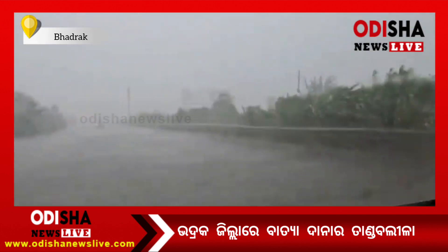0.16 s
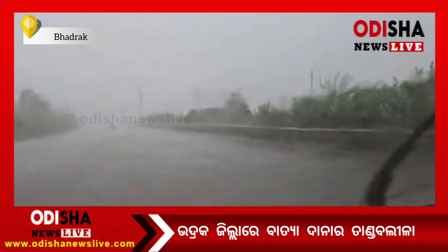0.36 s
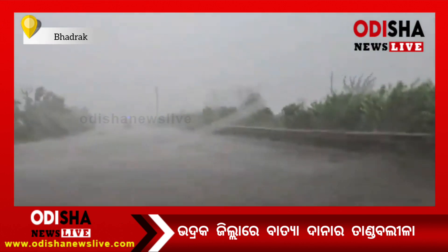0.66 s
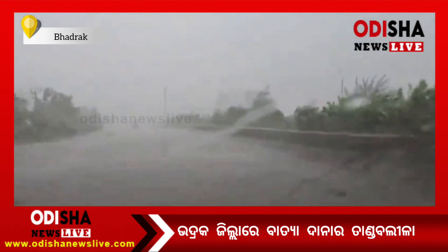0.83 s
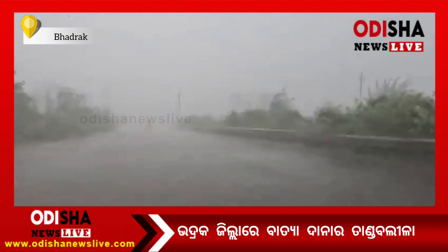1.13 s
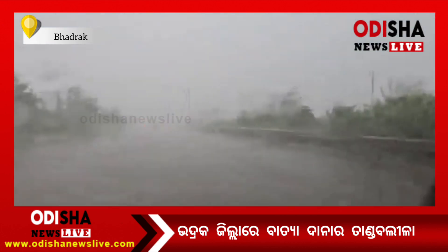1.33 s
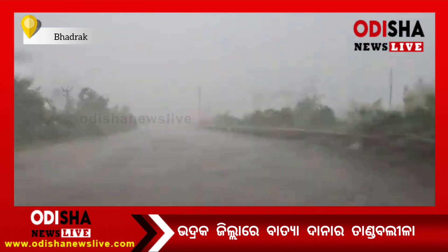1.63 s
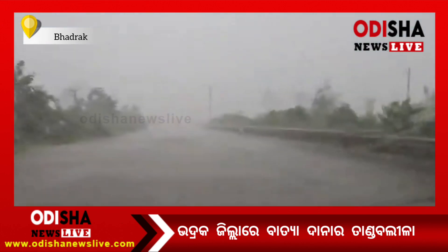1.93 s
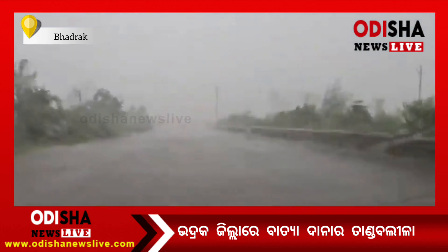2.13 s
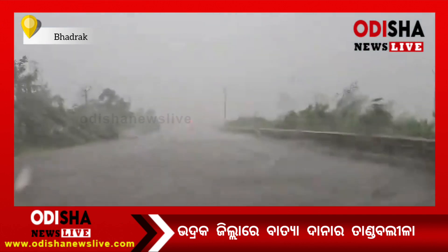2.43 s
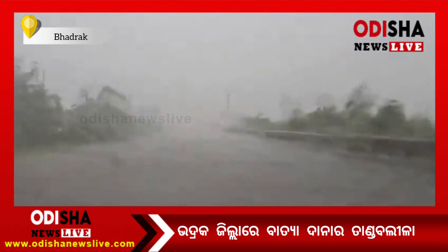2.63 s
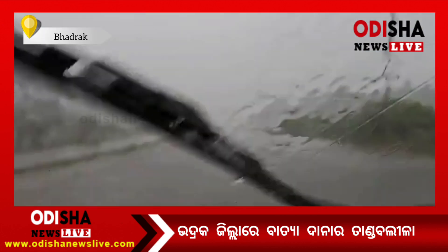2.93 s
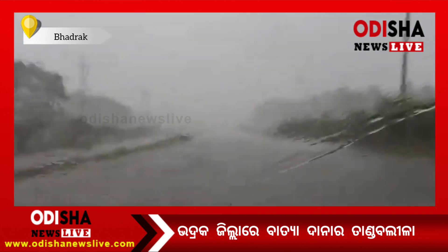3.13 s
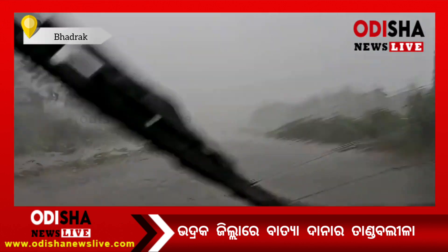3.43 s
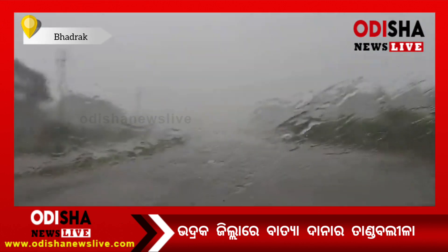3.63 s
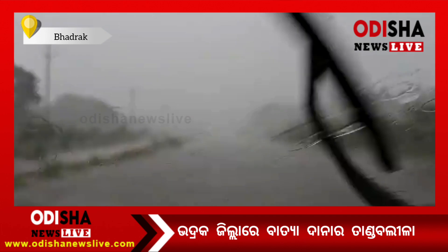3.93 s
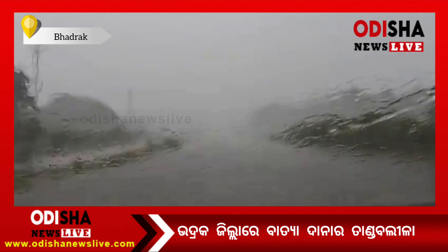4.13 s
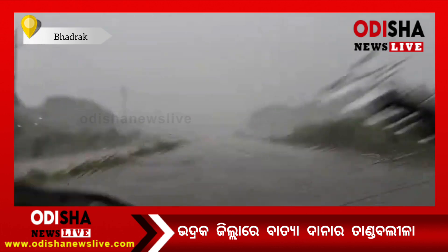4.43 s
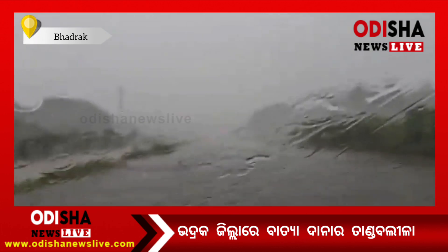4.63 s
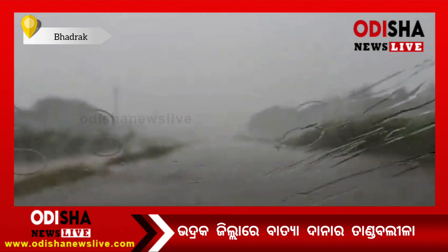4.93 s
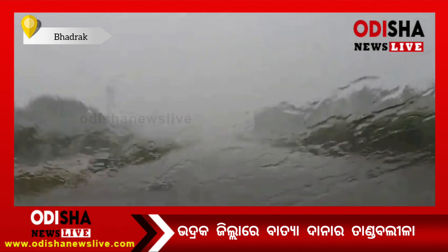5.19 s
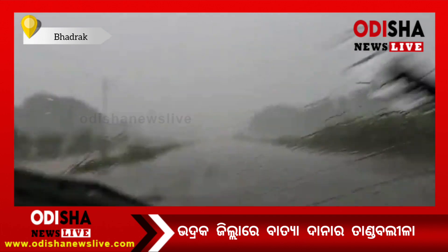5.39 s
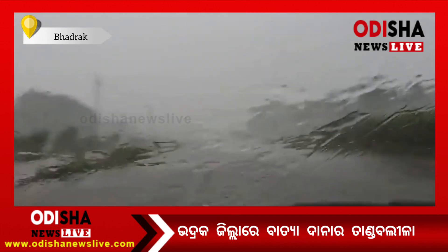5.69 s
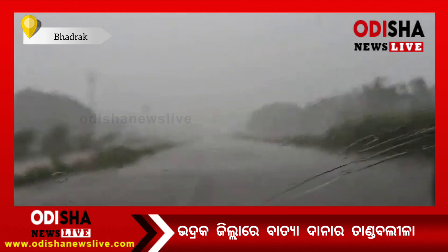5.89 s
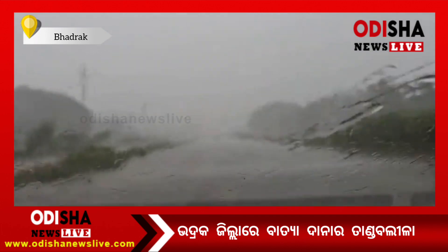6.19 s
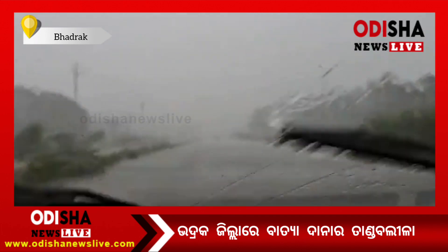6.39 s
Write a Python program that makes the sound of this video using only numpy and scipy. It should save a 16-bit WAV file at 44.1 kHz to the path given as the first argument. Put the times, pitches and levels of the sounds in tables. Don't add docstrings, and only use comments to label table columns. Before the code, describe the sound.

From inside a moving car in a storm, heavy rain sweeps across windscreen and roof in ragged hissing surges. The engine revs up low through the body, then eases off. Near the middle the sound cuts out for an instant; afterwards the rain gradually thins while deep gust booms and bumpy road rumble dominate. The microphone is close to the dashboard.

```python
import sys
import numpy as np
from scipy import signal
from scipy.fft import rfft, irfft, next_fast_len
from scipy.io import wavfile
from scipy.ndimage import uniform_filter1d, map_coordinates

SR = 44100
rng = np.random.default_rng(int(sys.argv[2]) if len(sys.argv) > 2 else 0)


def bounce(signal):
    frames = np.transpose(np.atleast_2d(signal))
    limited = np.clip(frames, -1, 1)
    pcm = np.round(limited * 32767).astype(np.int16)
    wavfile.write(sys.argv[1], SR, pcm)


def elevation(decibels):
    levels = np.asarray(decibels, float)
    return 10 ** (levels / 20)


N = 288834

# (time [s], gain [dB])
DROPOUT = [
    (0, 0),
    (2.9045, 0),
    (2.9058, -28),
    (2.914, -20),
    (2.918, -48),
    (2.931, -55),
    (2.933, -22),
    (2.943, 0),
    (6.55, 0),
]
ENGINE_STOP_S, SECOND_START_S = DROPOUT[3][0], DROPOUT[4][0]
TOP_HZ = 13100
HEAVY_DB = -35


def unit(x):
    return x / np.sqrt(np.mean(x ** 2) + 1e-20)


def along(points, hz):
    f, v = np.transpose(points)
    return np.interp(np.log(hz + 1), np.log(f + 1), v)


def curves(rows):
    s, *cols = np.transpose(rows)
    return [np.interp(np.arange(N) / SR, s, c) for c in cols]


def wobble(rate):
    knots = rng.standard_normal(int(N * rate / SR) + 4)
    return map_coordinates(knots, [np.arange(N) * rate / SR])


def filtered(x, response):
    m = next_fast_len(N + SR // 2)
    return irfft(rfft(x, m) * response(np.fft.rfftfreq(m, 1 / SR)), m)[..., :N]


def modes(table):
    def response(f):
        return sum((-1) ** k * elevation(db) * 1j * f * w / (c * c - f * f + 1j * f * w)
                   for k, (c, w, db) in enumerate(table))
    return response


def blend(table):
    def response(f):
        power = sum(np.abs(modes([row])(f)) ** 2 for row in table)
        return np.sqrt(power) / (1 + (f / 420) ** 4)
    return response


def first_stretch():
    return np.arange(N) < SECOND_START_S * SR


def each(pair):
    return np.where(first_stretch(), *pair)


def swells(rows, rise, rest_db):
    t = np.arange(0, N, 32) / SR
    s, db, ms = np.transpose(rows)[:, :, None]
    u = (t - s) * 1000 / np.where(t < s, rise * ms, ms)
    same_stretch = (t < SECOND_START_S) == (s < SECOND_START_S)
    power = np.sum(elevation(2 * (db - 20 * u * u)) * same_stretch, axis=0)
    return 10 * np.log10(np.repeat(power, 32)[:N] + elevation(2 * rest_db))


def cabin(pair, colour):
    # (frequency [Hz], left-right likeness [0-1])
    likeness = [(60, 1), (170, 0.95), (260, 0.86), (430, 0.64), (520, 0.69), (620, 0.27), (900, 0.18),
                (1150, 0.22), (1400, 0.6), (1650, 0.52), (2300, 0.082), (4000, 0.024)]
    # (frequency [Hz], left over right [dB])
    port_lean = [(60, 0.6), (200, 2.1), (900, 1.6), (1300, 0), (1800, -4), (2500, -2.5), (3000, -6.5),
                 (6000, -9.5), (7700, -5), (8600, -0.5), (9500, -10), (10700, -6), (12000, -11), (12900, 1)]
    # (frequency [Hz], lag [rad])
    port_lag = [(520, 0), (620, -0.3), (860, -0.06), (980, 3.5), (1300, 2), (1900, 2), (2100, 6.5)]

    def spread(hz):
        angle = np.arccos(np.clip(along(likeness, hz), -1, 1)) / 2
        return colour(hz) * [np.cos(angle), np.sin(angle)]

    def apart(hz):
        halves = np.array([[.5], [-.5]])
        return elevation(along(port_lean, hz) * halves) * np.exp(1j * along(port_lag, hz) * halves)

    mid, side = filtered(pair, spread)
    ports = filtered(np.array([mid + side, mid - side]), apart)
    return ports / np.sqrt(np.mean(ports.mean(0) ** 2))


def patchy(depth_db):
    z = signal.stft(rng.standard_normal((2, N)), nperseg=512)[2]
    field = uniform_filter1d(rng.standard_normal(z.shape[1:]), size=8, axis=0)
    field = uniform_filter1d(field, size=8, axis=1)
    return signal.istft(z * elevation(depth_db * unit(field)), nperseg=512)[1][:, :N]


def drops(per_second, spread_db):
    falls = rng.random((2, N)) < per_second / SR
    size_db = spread_db * rng.exponential(size=(2, N)).clip(0, 3)
    return unit(falls * rng.standard_normal((2, N)) * elevation(size_db))


def sheets(hits, colour):
    splash_hz, mist_hz = 1900, 8000

    def below(edge_hz):
        return lambda hz: 1 / (1 + (hz / edge_hz) ** 10)

    spray = cabin(hits, lambda hz: elevation(along(colour, hz)) * below(mist_hz)(hz))
    splash = filtered(spray, below(splash_hz))
    mist = cabin(hits, lambda hz: elevation(along(colour, hz)) * (1 - below(mist_hz)(hz)))
    return np.array([splash, spray - splash, mist])


def rain():
    # (peak [s], peak level [dB], fade to -20 dB [ms], more on the roof [dB])
    sweeps = [(0.318, -33.5, 424, -1.5), (0.826, -28, 298, -1), (1.056, -25.5, 274, 3.0),
              (1.341, -29.5, 147, -1.5), (1.449, -35.0, 740, 2), (1.61, -33.5, 68, 1.0),
              (1.852, -33.5, 70, -11), (1.951, -32, 240, -4), (2.131, -35.5, 120, 4.5), (2.24, -39, 120, 3),
              (2.36, -36, 140, -2), (2.579, -24.5, 210, -1.0), (2.846, -27, 230, 2.5),
              (3.093, -33.5, 158, 7), (3.224, -38.5, 47, 10), (3.368, -35, 148, -7), (3.58, -40, 1002, 4),
              (3.628, -35.5, 270, 3.5), (3.875, -43, 190, -5), (4.2, -40.5, 167, 0.0),
              (4.419, -36.0, 446, 0.5), (4.754, -40.5, 380, 7), (5.041, -42.5, 128, -2),
              (5.174, -39, 190, 1.5), (5.456, -42, 234, -1.0), (5.692, -43.5, 70, -2),
              (5.806, -50.5, 420, -11), (6.041, -46, 145, -7), (6.196, -42, 188, -2.5),
              (6.61, -39.5, 328, -7)]
    # (time [s], level [dB])
    drizzle = [(0, -36.5), (2.9, -43), (2.94, -41.5), (6.55, -52.5)]
    # (time [s], depth [dB], half width [ms])
    wind_lulls = [(0.583, -1.5, 17), (1.294, -5, 9.4), (2.235, -3.5, 18), (2.458, -3.5, 20),
                  (3.006, -8, 8.2), (3.543, -3, 7.3), (4.897, -4.5, 25), (5.306, -5, 9), (5.396, -3, 7.4),
                  (5.491, -4, 11), (5.557, -4, 12), (5.614, -2.5, 22), (6.049, -3, 14), (6.329, -3.0, 17),
                  (6.426, -4.5, 17)]
    # (frequency [Hz], density [dB per Hz])
    spray_colours = [
        [(410, -5), (700, -6.5), (831, 3.5), (1020, 1), (1310, 1), (1550, 1), (2110, 1), (2560, -3),
         (3230, 0.5), (6110, -2.5), (7520, -8.5), (10300, -24), (11800, -19.5), (13000, -27)],
        [(530, -44), (900, -4), (984, 0.5), (1160, 2.5), (1650, 0.5), (2250, 0.5), (2630, -3.5), (4170, 1),
         (4880, -5.5), (5450, -3.5), (7290, -8.5), (10300, -24), (11900, -20.5), (13000, -23)],
    ]
    # (frequency [Hz], width [Hz], level [dB])
    roof_modes = [(280, 56, -7.5), (510, 73, -1), (653, 284, -7.5), (820, 106, -6.5)]

    s, db, fade, more_db = np.transpose(sweeps)
    t = np.arange(N) / SR
    lull_db = sum(depth * np.exp(-((t - at) * 1000 / ms) ** 2) for at, depth, ms in wind_lulls)
    drizzle_db = curves(drizzle)[0]
    spray_db = swells(np.c_[s, db, fade], 0.8, drizzle_db) + lull_db
    roof_db = swells(np.c_[s, db + more_db, fade], 0.8, drizzle_db) + lull_db

    harder_db = spray_db - HEAVY_DB
    mist_db = each((-11.5, -13)) + 0.11 * harder_db + .7 * wobble(7)
    splash_db = each((0.76, -0.5)) - each((0.36, 0.05)) * harder_db + 0.97 * wobble(9)
    drum_db = -38 + 0.61 * (roof_db - HEAVY_DB)
    flurry_db = .5 * wobble(16) + .7 * wobble(40)
    sparse = np.clip((-34 - spray_db) / 16, 0, .7)
    gaps = 1 - sparse * np.clip(2 * (wobble(80) - 1.1), 0, 1)

    hits = patchy(depth_db=1.32) + elevation(-11) * drops(per_second=3000, spread_db=4.0)
    first, second = [sheets(hits, colour) for colour in spray_colours]
    splash, spray, mist = np.where(first_stretch(), first, second)
    knocks = patchy(depth_db=-1.15) + elevation(-8.5) * drops(per_second=600, spread_db=2)
    roof = cabin(knocks, modes(roof_modes))
    glass = elevation(spray_db) * gaps * (elevation(splash_db) * splash + spray + elevation(mist_db) * mist)
    return elevation(flurry_db) * (glass + elevation(drum_db) * roof)


def boom():
    # (peak [s], peak level [dB], fade to -20 dB [ms])
    gust_swells = [(0.06, -28, 108), (0.35, -27.0, 158), (0.55, -30, 127), (0.83, -28, 260),
                   (1.18, -31, 470), (1.59, -16, 175), (2.05, -25.5, 355), (2.5, -36, 110),
                   (2.86, -24.5, 170), (3.0, -31, 200), (3.01, -20, 120), (3.19, -15, 167),
                   (3.24, -38, 248), (3.52, -17.5, 168), (3.67, -32, 1160), (3.94, -16.5, 246),
                   (4.31, -21.5, 202), (4.67, -21, 98), (4.87, -17.5, 156), (5.12, -18.0, 112),
                   (5.28, -16, 130), (5.46, -18.0, 229), (5.85, -21, 670), (6.39, -19, 240)]
    level_db = swells(gust_swells, rise=0.73, rest_db=-33.5) + 5
    pitch_hz = 29.8 + wobble(3) + 1.8 * wobble(14)
    ring = np.sqrt(2) * np.sin(2 * np.pi * np.cumsum(pitch_hz) / SR) * elevation(1.2 * wobble(16))
    buffet = unit(filtered(rng.standard_normal((2, N)), modes([(32.5, 1.77, 0)])))
    buffet = buffet[0] + 0.12 * buffet[1] * [[1], [-1]]
    return elevation(level_db) * (ring + elevation(-11.5) * buffet)


def road():
    # (time [s], level [dB])
    roughness = [(0, -29.5), (.6, -28.5), (1, -25), (1.5, -25.5), (2.3, -25.5), (2.9, -24), (2.94, -24),
                 (3.2, -23.5), (3.62, -25.5), (3.76, -22.5), (4, -26), (4.4, -25.5), (4.85, -21),
                 (5.3, -23.5), (5.7, -25.5), (6.1, -28.5), (6.55, -29)]
    # (frequency [Hz], width [Hz], level [dB])
    spring_modes = [(40.8, 7.9, 0.3)]
    floor_modes = [(40.7, 11, -5.5), (55.8, 10, 1.5), (70, 9.5, -6), (89, 17, -10)]
    door_modes = [(110, 18, 4.5), (134, 13, 0), (150, 7, -5.5), (166.3, 14.5, -1)]
    dash_modes = [(208, 32, -0.5), (259, 15, 2.5), (270, 8.3, -1), (300, 17.5, -21), (365, 19, -9)]

    def shaken(table, level_db):
        return elevation(level_db) * cabin(rng.standard_normal((2, N)), blend(table))

    rough_db = curves(roughness)[0]
    floor_db = each((-23.5, -20)) + 0.35 * (rough_db - rough_db.mean())
    doors_db = rough_db + each((-2.5, -0.5))
    dash_db = rough_db + each((-10, -10)) + 0.72 * wobble(9)
    body = shaken(spring_modes, each((-32.5, -28.5))) + shaken(floor_modes, floor_db)
    return body + shaken(door_modes, doors_db) + shaken(dash_modes, dash_db)


def engine():
    # (time [s], firing rate [Hz])
    revs = [
        (0, 54.1),
        (.22, 55.8),
        (.7, 57.85),
        (1.5, 66.8),
        (2.03, 73.65),
        (2.33, 73),
        (2.61, 65.06),
        (2.78, 56.6),
        (2.9, 54.5),
    ]
    # (time [s], opening [0-1])
    throttle = [
        (0, 0.3),
        (.6, 0.52),
        (.97, 1),
        (1.5, 1),
        (2.0, 0.72),
        (2.08, 0.3),
        (2.45, 0.13),
        (2.7, 0.2),
        (2.9, 0.3),
    ]
    pulling_db, coasting_db = (-26.5, -26, -39), (-21.5, -34, -52)
    pan_hz, pan_width_hz, pan_db = 56, 1, 3.5
    clutch_s, clutch_len_s, clutch_db = 2.1, .07, -11

    hz = curves(revs)[0]
    load = np.clip(curves(throttle)[0], 0, 1)
    slack_db = clutch_db * np.exp(-((np.arange(N) / SR - clutch_s) / clutch_len_s) ** 2)
    orders_db = [off + load * (on - off) + slack_db for on, off in zip(pulling_db, coasting_db)]
    orders_db[0] = orders_db[0] + pan_db / (1 + ((hz - pan_hz) / pan_width_hz) ** 2)
    phase = 2 * np.pi * np.cumsum(hz * (1 + 0.0061 * wobble(15))) / SR
    tones = elevation(orders_db[1] - 19) * np.sin(4 * phase)
    for k, db in enumerate(orders_db, start=1):
        unsteady_db = db + 1.2 * wobble(9) + 2 * wobble(22)
        tones = tones + elevation(unsteady_db) * np.sqrt(2) * np.sin(k * phase)
    return tones * (np.arange(N) < ENGINE_STOP_S * SR) * elevation([[.4], [-.4]])


def splats():
    # (time [s], peak level [dB])
    heavy_drops = [
        (2.2553, -23),
        (2.2744, -39),
    ]
    out, t = np.zeros((2, N + SR)), np.arange(SR // 20) / SR
    for s, db in heavy_drops:
        decay = elevation(db + 10 - 60 * t / .022)
        burst = rng.standard_normal((2, len(t))) * decay * (1 - np.exp(-t / .0004))
        out[:, round(s * SR):][:, :len(t)] += burst * elevation([[-5], [3]])
    return filtered(out[:, :N], lambda hz: modes([(6200, 7500, 0)])(hz) ** 4)


def bumps():
    # (peak [s], peak level [dB], panel pitch [Hz])
    jolts = [(2.739, -21, 110), (2.86, -36, 303.4), (2.97, -20.5, 117.2), (2.979, -17, 63),
             (3.03, -33, 161), (3.079, -26.5, 131), (3.09, -33, 252.5), (3.11, -34.5, 229),
             (3.222, -19.5, 80), (3.37, -28, 130.3), (3.38, -16, 49.5), (3.418, -25.0, 88.3),
             (3.46, -21, 77), (3.51, -27, 147), (3.759, -24.0, 126.6), (3.81, -31.5, 164),
             (3.999, -30, 154.4), (4.121, -27.5, 56), (4.31, -28, 163), (4.46, -25, 156.7),
             (4.56, -20.5, 57.7), (4.8, -20.5, 113), (4.94, -25.5, 159.6), (4.97, -36.5, 213),
             (5.019, -18, 51), (5.07, -31, 191), (5.079, -22, 133.2), (5.3, -32, 209), (5.49, -28.0, 154),
             (6.29, -21.5, 75)]
    rise_ms, fade_ms = 91, 142
    out, t = np.zeros(N + SR), np.arange(-SR // 4, SR // 4) / SR
    u = t * 1000 / np.where(t < 0, rise_ms, fade_ms)
    for (s, db, hz), start in zip(jolts, rng.random(len(jolts))):
        hum = np.sqrt(2) * np.sin(2 * np.pi * (hz * t + start))
        out[round(s * SR):][:len(t)] += elevation(db - 20 * u * u) * hum
    return out[SR // 4:][:N] * elevation([[.5], [-.5]])


def scene():
    return rain() + boom() + road() + engine() + splats() + bumps()


def thinned(x):
    # (frequency [Hz], threshold [dB])
    weak_bands = [(800, -30), (1300, -8), (2600, -7), (4000, -10), (7500, -8.5), (8600, -4.5),
                  (10200, -2.5), (10900, -5), (11500, -11), (12300, -7), (12900, -2)]
    hz, _, z = signal.stft(x, SR, nperseg=2048, noverlap=1536)
    bins, frames = z.shape[1:]
    power = np.sum(np.abs(z) ** 2, axis=0) + 1e-20
    now = uniform_filter1d(uniform_filter1d(power, size=40, axis=0), size=3, axis=1)
    usual = np.sqrt(uniform_filter1d(now, size=40, axis=1) * np.median(now, axis=1, keepdims=True))
    lull_db = 10 * np.log10(np.abs(now / usual))
    whim = np.kron(rng.standard_normal((bins // 6 + 1, frames // 5 + 1)), np.ones((6, 5)))
    whim_db = 4 * whim[:bins, :frames]
    edge_hz = TOP_HZ - 170 * np.floor(np.repeat(rng.exponential(1.2, frames), 5)[:frames])
    strong = .4 * lull_db + whim_db > along(weak_bands, hz)[:, None]
    kept = strong & (hz[:, None] < edge_hz)
    return signal.istft(z * kept, SR, nperseg=2048, noverlap=1536)[1][:, :N]


def low_pass(x):
    return signal.sosfilt(signal.butter(12, 13640, fs=SR, output="sos"), x)


def record(dry):
    heard = filtered(dry, lambda hz: (1j * hz / 22 / (1 + 1j * hz / 22)) ** 2)
    heard = heard / (1 + np.abs(heard / .66) ** 4) ** (1 / 4)
    joined = thinned(heard) * elevation(curves(DROPOUT)[0])
    mix = filtered(joined, lambda hz: hz < TOP_HZ)
    return low_pass(mix)


dry = scene()
out = record(dry)
bounce(out)
```